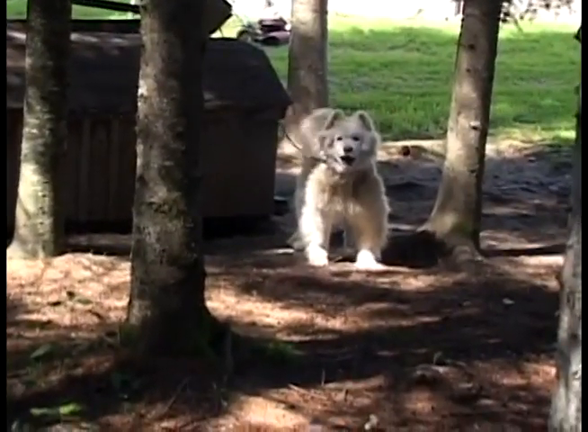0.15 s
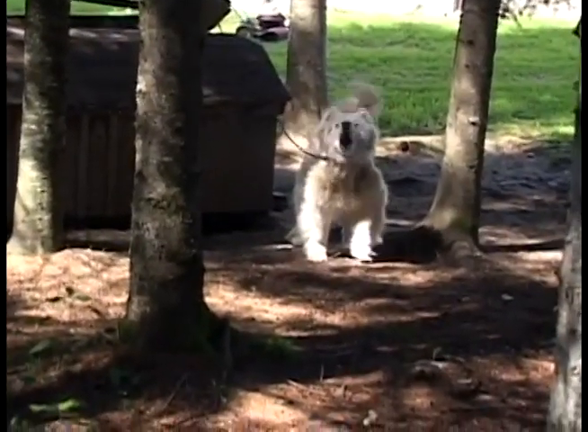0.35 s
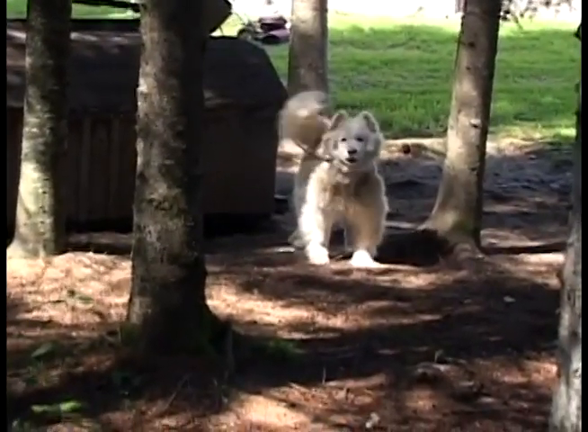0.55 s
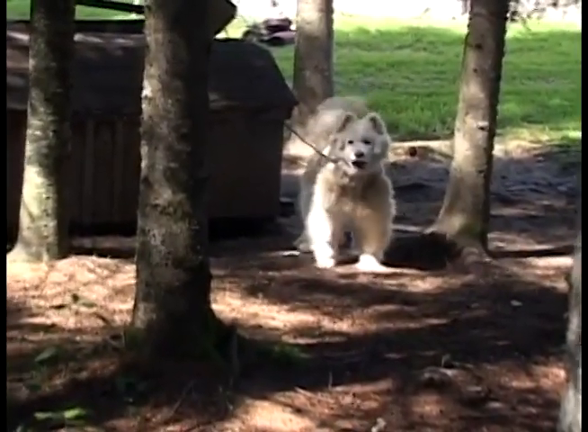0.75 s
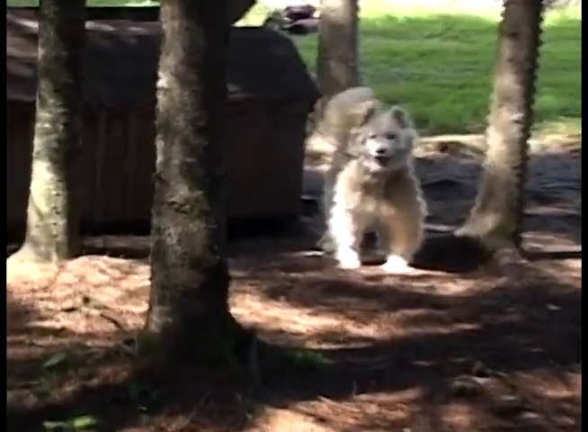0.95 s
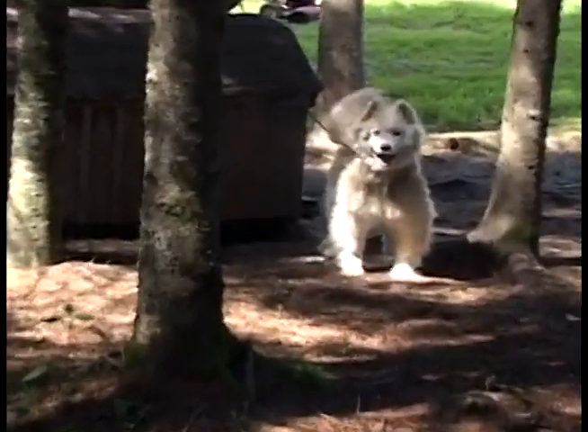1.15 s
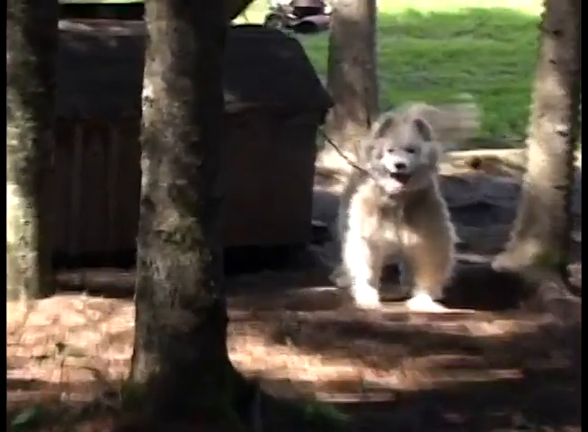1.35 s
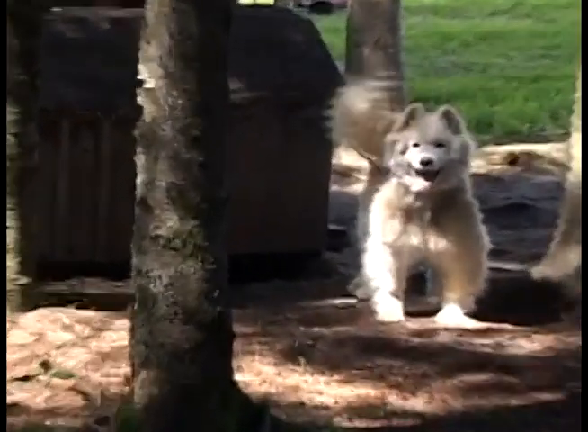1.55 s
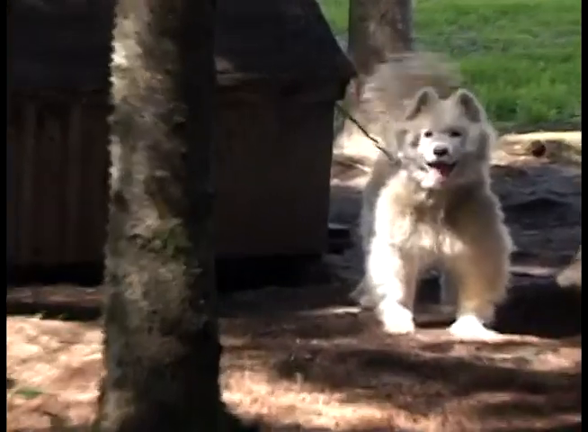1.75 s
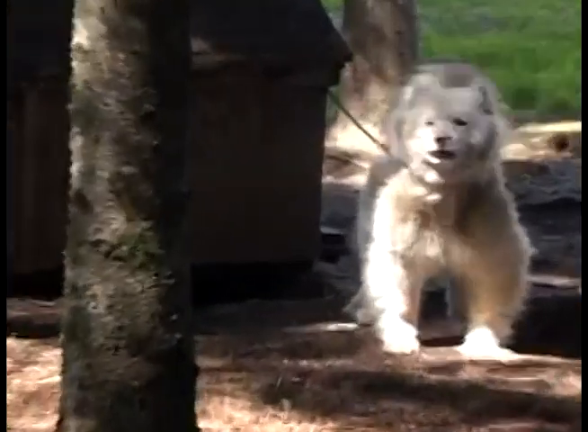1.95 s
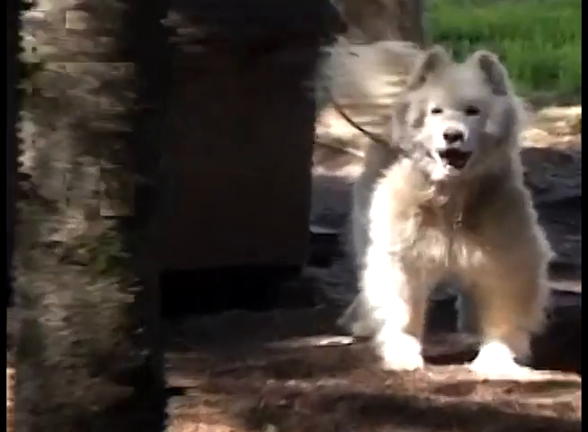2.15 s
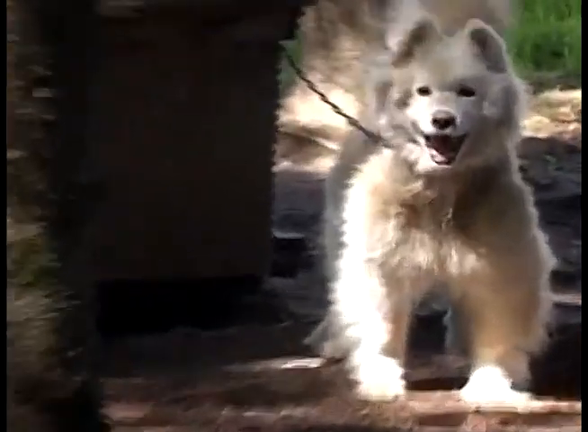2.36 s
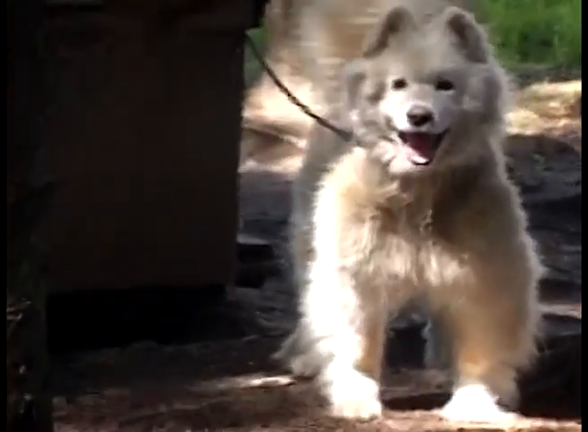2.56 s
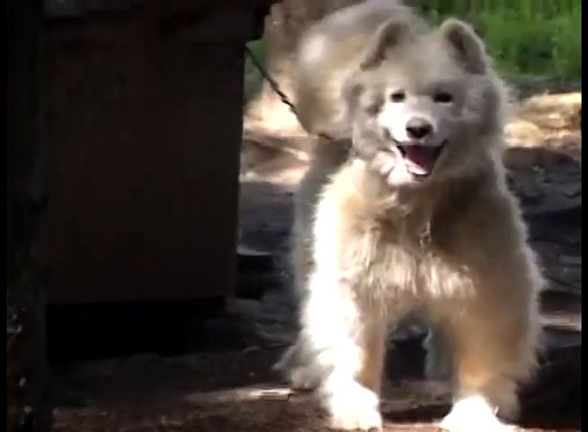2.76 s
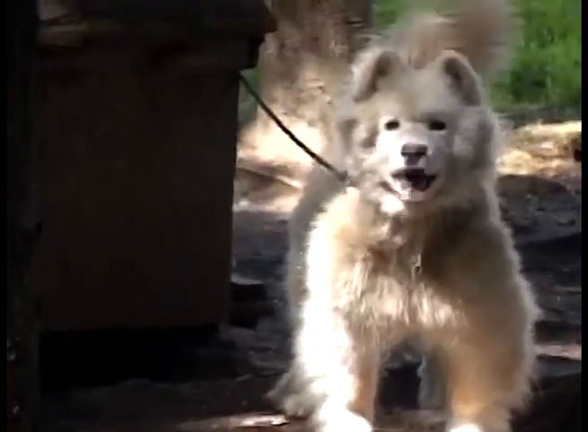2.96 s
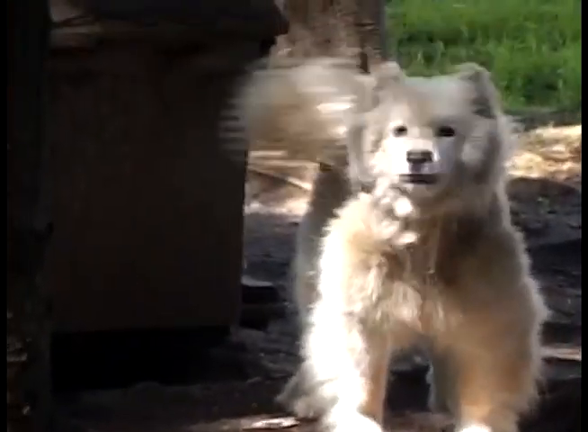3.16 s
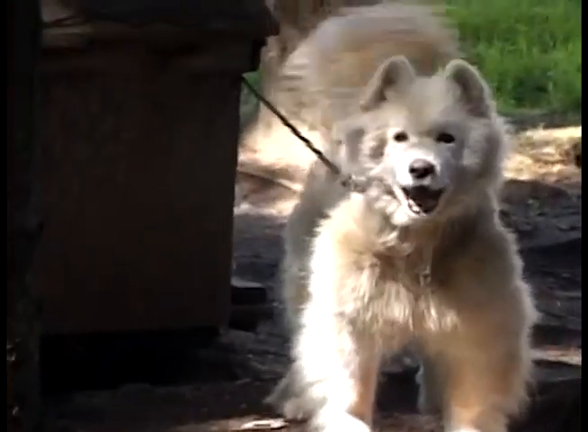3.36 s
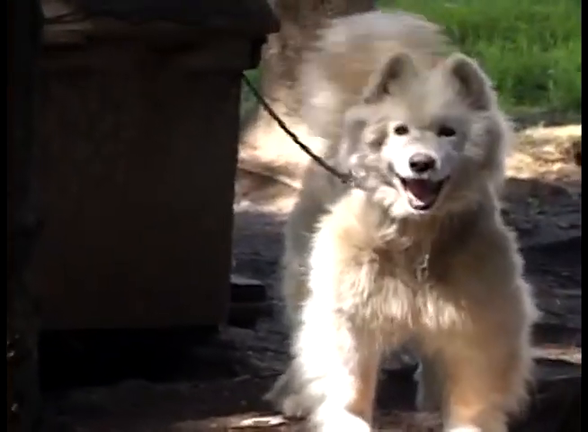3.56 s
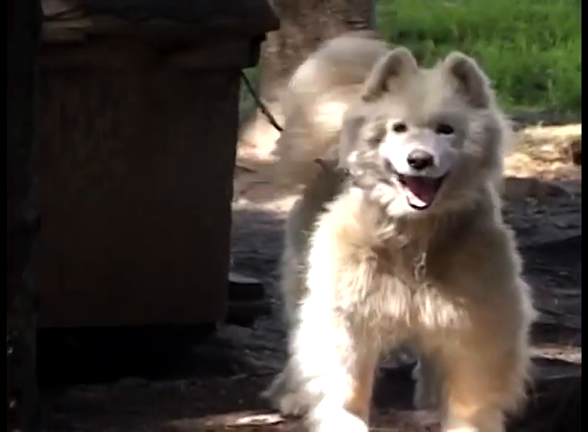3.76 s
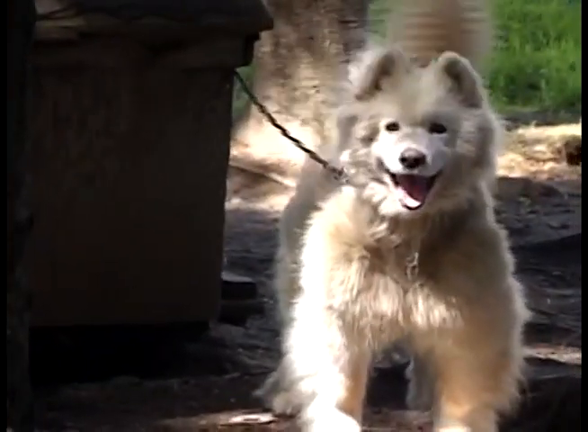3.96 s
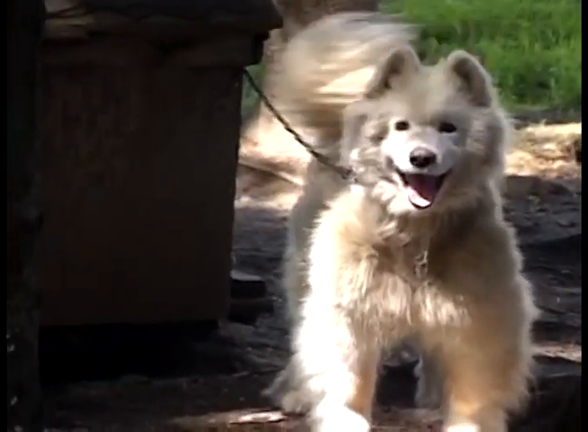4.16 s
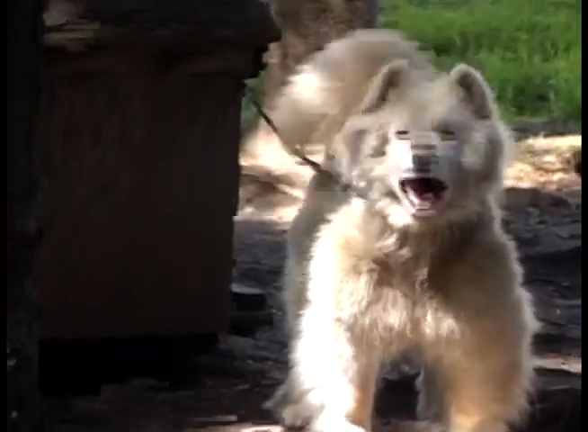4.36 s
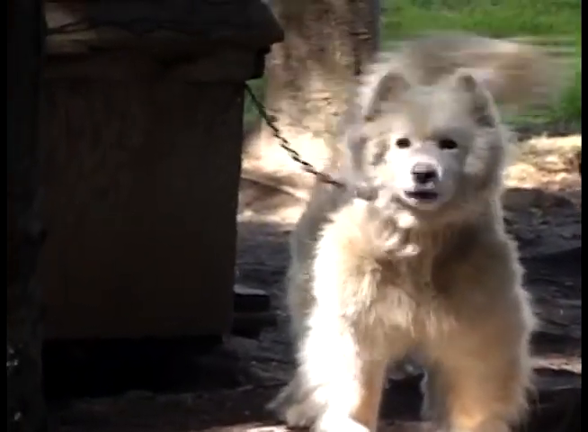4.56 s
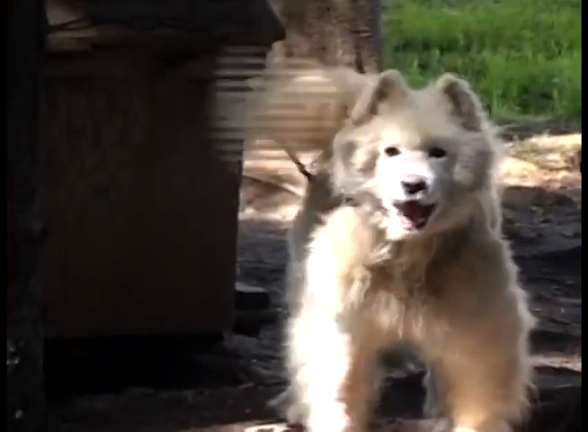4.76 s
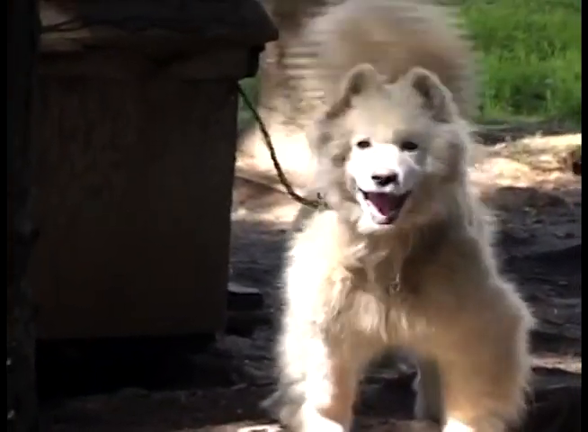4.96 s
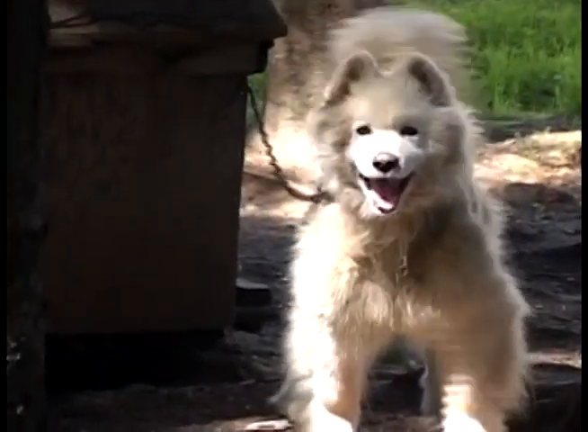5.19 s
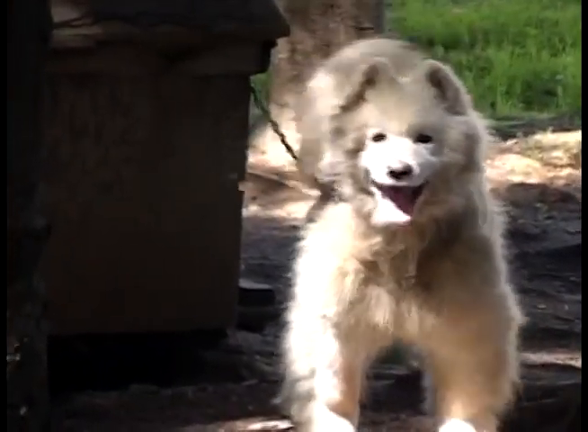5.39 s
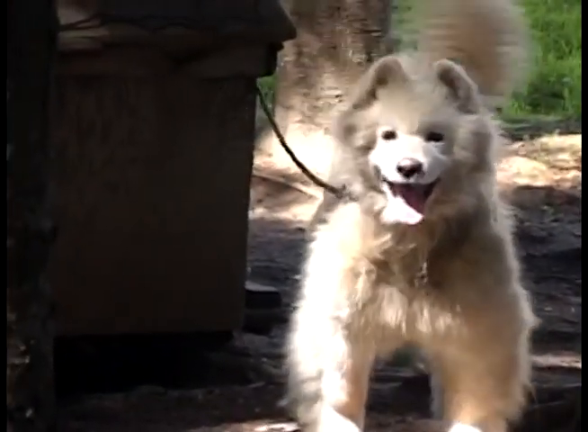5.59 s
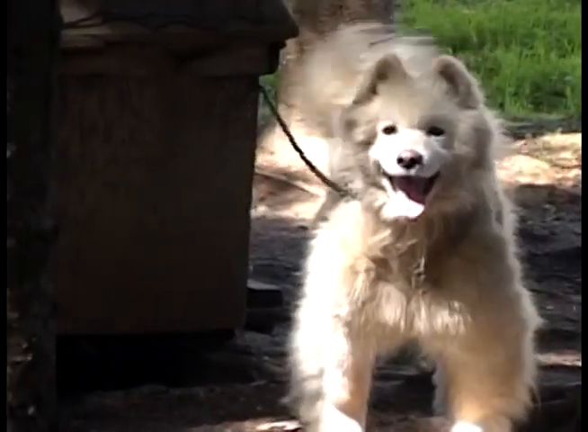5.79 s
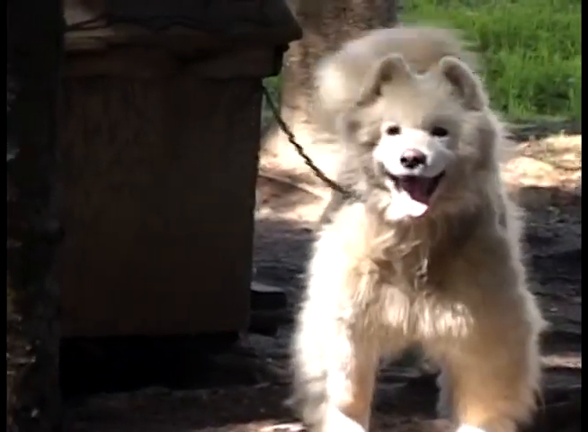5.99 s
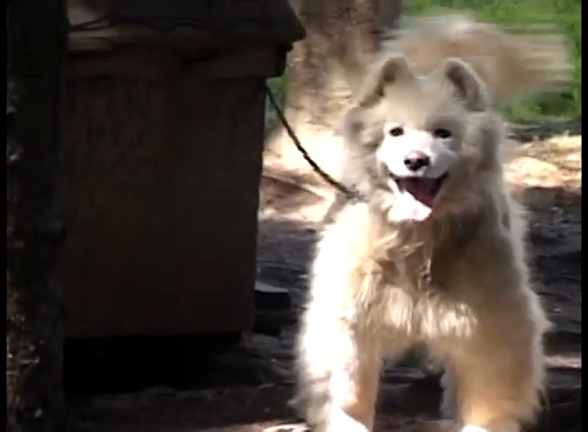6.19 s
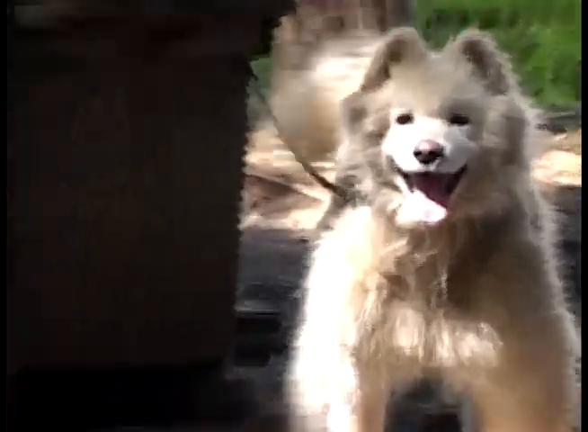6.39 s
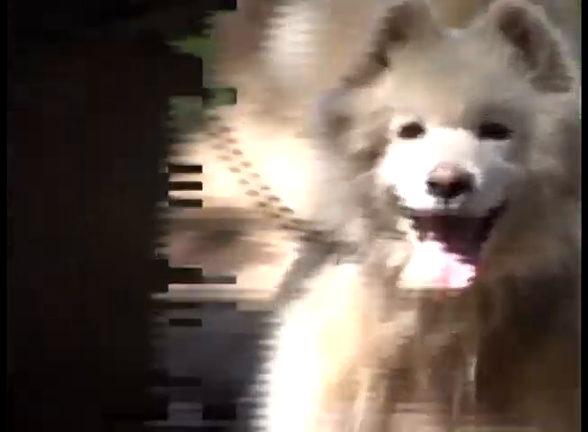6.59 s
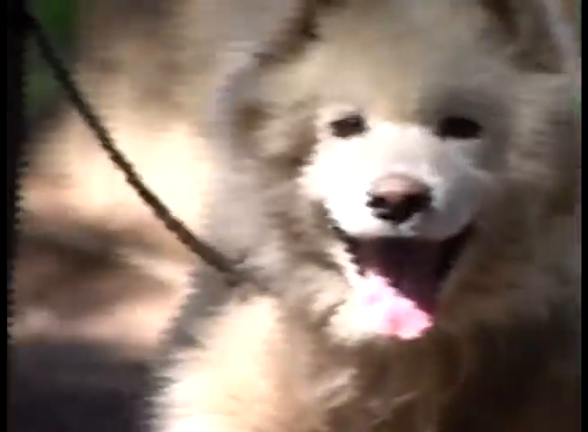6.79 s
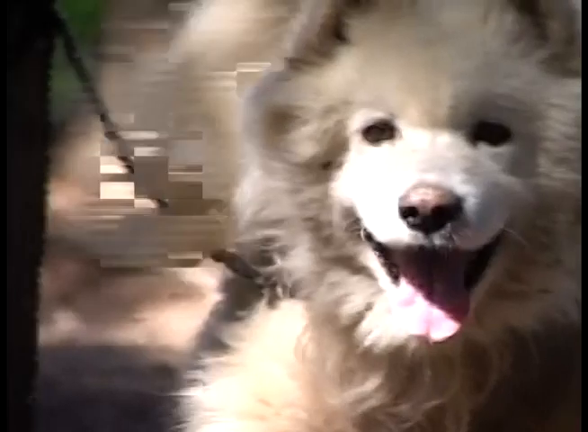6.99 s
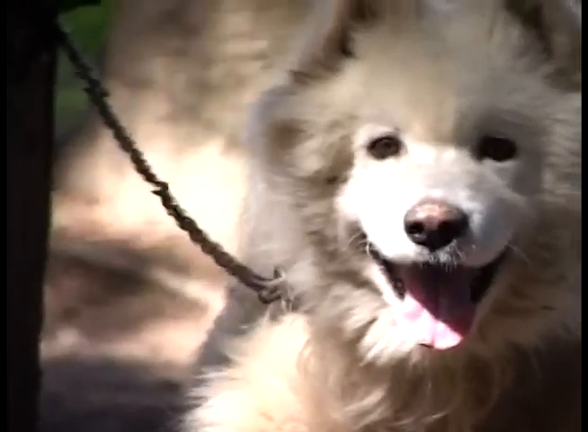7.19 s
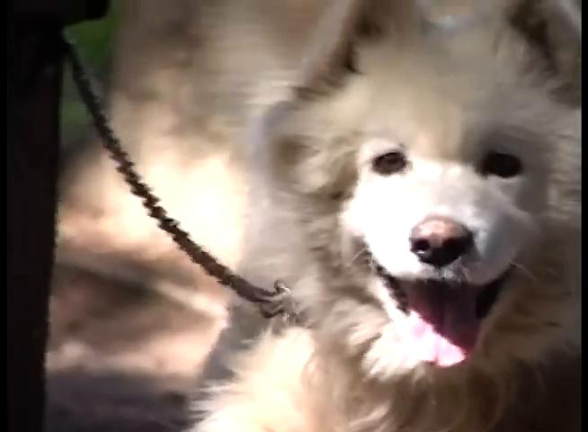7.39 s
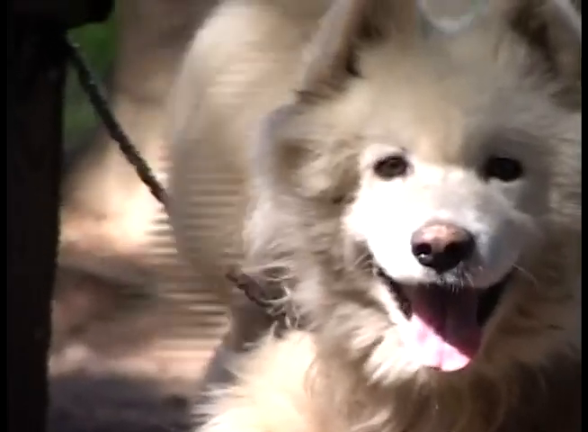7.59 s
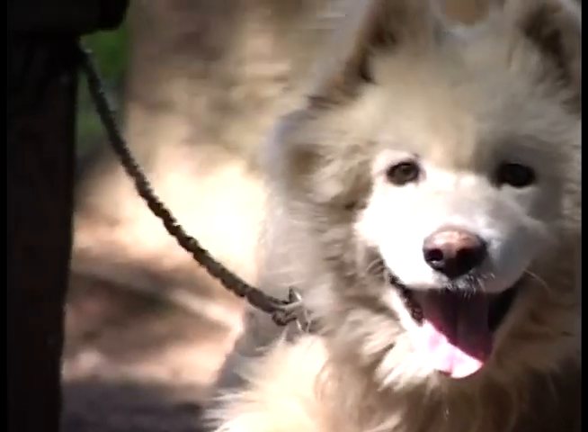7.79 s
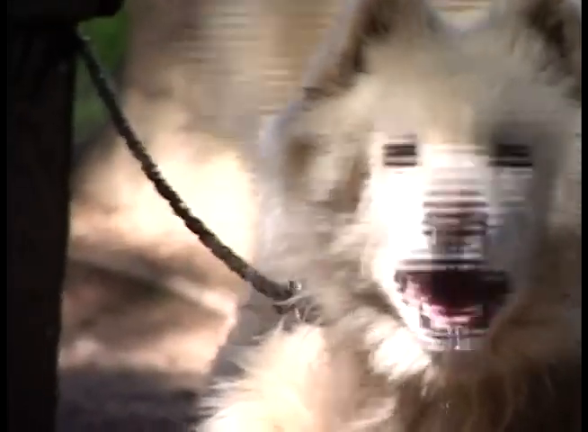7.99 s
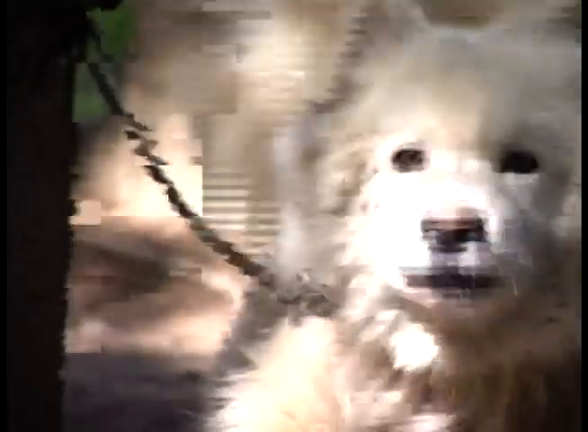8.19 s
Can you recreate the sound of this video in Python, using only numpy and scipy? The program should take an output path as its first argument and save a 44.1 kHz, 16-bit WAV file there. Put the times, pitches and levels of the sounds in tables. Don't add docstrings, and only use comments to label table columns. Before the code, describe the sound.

A large dog gives four short hoarse barks over a whirring tape camcorder, a long pause with a wood knock, then one last bark.

```python
import sys
import numpy as np
from scipy import signal
from scipy.fft import rfft, irfft, next_fast_len
from scipy.io import wavfile
from scipy.ndimage import uniform_filter1d, map_coordinates

SR = 44100
rng = np.random.default_rng(int(sys.argv[2]) if len(sys.argv) > 2 else 0)


def boost(x):
    u = np.asarray(x, float) / 20
    return 10 ** u


def output_pcm(signal):
    pcm = np.clip(np.atleast_2d(signal).T, -1, 1) * 32767
    wavfile.write(sys.argv[1], SR, np.round(pcm).astype(np.int16))


N = 363384
T = np.arange(N) / SR

# (voice start [s], length [s], level [dB], first throat pitch [Hz], mouth resonance [Hz])
BARKS = [
    (0.419, 0.16, -15.5, 497, 935),
    (1.898, 0.17, -14.5, 610, 941.4),
    (3.082, 0.17, -14.5, 555, 969.4),
    (4.468, .16, -14, 751.3, 944.6),
    (8.102, 0.17, -14.5, 740.6, 964.6),
]
# (time [s], peak level [dB], throat ring [Hz])
FOLD_TICKS = [
    (0.395, -21.5, 545),
    (1.882, -21.5, 727),
    (1.895, -17.5, 590),
    (3.053, -29, 731.2),
    (3.082, -12, 586.6),
    (4.419, -27, 874),
    (4.442, -18, 863),
    (4.463, -10.5, 741),
    (8.083, -23, 745),
    (8.105, -9, 704),
]
# (centre [Hz], width [Hz], level [dB])
RASP_MODES = [(778, 340, 15.5), (1219, 255, 15), (1567, 122, 13.5), (1947, 154, 4.5), (2214, 190, 2),
              (2521, 99, 11.5), (2810, 210, 2), (440, 69, 18)]
# (centre [Hz], width [Hz], level [dB])
HISS_MODES = [(3330, 560, 8), (4150, 370, 11.5), (5070, 800, 3.5), (6160, 460, 13), (8070, 420, 5.5),
              (9960, 1160, 4), (11500, 660, 8.5), (13690, 1600, 5.5)]
# (delay [s], level [dB])
SLAPS = [
    (.003, -12),
    (.012, -11.5),
    (.023, -12),
    (.055, -26),
    (.088, -27.5),
    (0.13, -32.5),
]
# (frequency [Hz], t60 [s])
YARD_DECAY = [(400, 1), (950, 1), (2500, 1), (8000, 1)]
# (centre [Hz], width [Hz], level [dB])
KENNEL_MODES = [(610, 110, 2), (960, 39, 5.5), (1420, 140, 5), (2580, 200, -3)]
# (time [s], level [dB])
OVERLOADS = [
    (0.517, -31.5),
    (1.967, -28),
    (1.995, -23),
    (3.162, -20.5),
    (4.527, -23.5),
    (8.162, -23),
    (8.225, -23),
]
# (time [s], peak level [dB], ring [Hz], t60 [s])
CLINKS = [
    (.165, -50, 4000, 0.087),
    (0.274, -52, 5870, .08),
    (.3, -49, 5560, 0.072),
    (.315, -52, 6200, .06),
    (5.522, -41, 870, 0.073),
    (5.53, -37, 873, 0.06),
]
# (frequency [Hz], level [dB per Hz])
WHIRR_COLOUR = [(30, -36), (70, -32), (130, -14), (300, -17), (500, -11), (1050, -8), (1400, -14.5),
                (1800, -18.5), (3000, -20), (5200, -30), (6400, -33), (7000, -41.5), (13500, -53.5),
                (15500, -68)]
# (centre [Hz], width [Hz], level [dB])
CASING_HUMPS = [(231, 23, 13), (401, 78, 11.5), (727, 6.3, 11.5), (857.5, 4.43, 12), (1203, 48, 3.5),
                (1336, 29, 9), (2502, 79, 8.5), (4295, 79, 6), (5975, 130, 6.5), (7770, 570, 6.5),
                (9650, 360, 8.5), (11420, 1000, 7.5)]
# (frequency [Hz], level [dB rms])
DRUM_TONE = [(150, -55.5)]
# (time [s], firing rate [Hz], level [dB])
ENGINE_PATH = [(0, 72, -78), (1.8, 78, -71), (2.6, 77, -77), (3.3, 78.5, -71), (4, 79, -70), (4.7, 76, -87),
               (5.3, 79, -66), (5.7, 73.5, -82), (6.8, 77.5, -77), (7.46, 75.5, -74), (8.24, 69, -84)]
# (frequency [Hz], level [dB rms])
MAINS_HUM = [(30, -92), (60, -87), (100, -93), (120, -95), (200, -102), (219, -102), (240, -100),
             (899, -103)]
# (frequency [Hz], level [dB per Hz])
OPEN_HISS = [(20, 4), (300, 0), (3400, 0), (6700, -1), (9400, -3), (12100, -4.5), (13500, -7), (14100, -13),
             (14800, -32)]


def dog():
    throat_db, gape, throat_hz, mouth_hz, fade, leak = gesture()
    mouth_db = throat_db + 2.5 - 12.5 * (1 - gape)
    rasp_db = -8.5 + 5.5 * gape - 6.5 * fade
    creak_db = -20 * np.sin(np.pi * 115 * T) ** 2
    hiss_db = -24.5 - gape + leak * (26 + creak_db)

    pitch = mouth_hz / 3
    voice = folds(pitch, jitter=.07, scatter_db=2, growl_db=3, breath=.42)
    band = signal.butter(2, [360, 1500], "band", fs=SR, output="sos")
    throat = gliding(voice, throat_hz * (1 + .07 * wobble(30)), width_hz=110)
    throat = steady(signal.sosfilt(band, throat), .03)
    mouth = gliding(voice, mouth_hz * (1 + .02 * wobble(30)), width_hz=85)
    mouth = steady(signal.sosfilt(band, mouth), .03)

    rasp = tract(voice, RASP_MODES, lambda f: low_cut(500, order=2)(f) / (1 + (f / 3000) ** 6), waver_db=2)
    airy = folds(pitch, jitter=.12, scatter_db=3, growl_db=1, breath=.95)
    hiss = tract(airy, HISS_MODES, lambda f: low_cut(2500, order=2)(f) / (1 + 1j * f / 6000) ** 2, waver_db=3)
    top = signal.sosfilt(signal.butter(2, 7000, "high", fs=SR, output="sos"), hiss)
    hiss = hiss - top * (1 - boost(-10 * (2 - gape)))

    upper = boost(rasp_db) * rasp + boost(hiss_db) * hiss
    throat = boost(-3.5 * gape) * throat
    return boost(5) * (boost(throat_db) * (throat + upper) - boost(mouth_db) * mouth)


def gesture():
    lead_s, lead_db, start_db, catch_db = .04, -32, -10, -6
    attack, hold, end_db = 0.2, 0.66, -15
    widest, opening, closing = 0.57, 0.32, 0.25
    open_throat_hz, shut_throat_hz, throat_sag = 675, 610, .94
    earlier_db, earlier_t60_s, earlier_hz = -47, 1.58, 527

    start, length, db, first_hz, mouth_hz = np.transpose(BARKS)
    k = np.clip(np.searchsorted(start - 2 * lead_s, T) - 1, 0, len(BARKS) - 1)
    since = T - start[k]
    u = since / length[k]
    leak = np.clip(-since / lead_s, 0, 2)
    fade = np.clip((u - hold) / (1 - hold), 0, 1)
    effort_db = db[k] + start_db * np.clip(1 - u / attack, 0, 1) + lead_db * leak
    effort_db = effort_db + catch_db * np.clip(-since / 0.0026, 0, 1)
    effort_db = effort_db + end_db * fade - 60 * np.clip((u - 1) / 0.17, 0, 1)

    gape = np.exp(-((u - widest) / np.where(u < widest, opening, closing)) ** 2)
    last_hz = throat_sag * np.minimum(first_hz[k], shut_throat_hz)
    shut_hz = np.where(u < widest, first_hz[k], last_hz)
    throat_hz = shut_hz + gape * (open_throat_hz - shut_hz)

    ring_db = earlier_db - 60 * T / earlier_t60_s
    ring = ring_db > effort_db
    climb = .15 * (1 - gape) * (u < widest) * ~ring
    return (np.maximum(effort_db, ring_db), np.where(ring, .8, gape), np.where(ring, earlier_hz, throat_hz),
            mouth_hz[k] * (1 - climb), fade, np.where(ring, 0, np.minimum(leak, 1)))


def folds(pitch_hz, jitter, scatter_db, growl_db, breath):
    cycles = np.cumsum(pitch_hz * (1 + jitter * wobble(250))) / SR
    growl = boost(growl_db * np.cos(2 * np.pi * cycles / 3))
    pulses = np.diff(np.floor(cycles), prepend=0) * boost(scatter_db * wobble(300))
    puffs = rng.standard_normal(N) * (2 + np.cos(2 * np.pi * cycles))
    share = np.clip(breath, 0, 1)
    return growl * (np.sqrt(1 - share) * unit(pulses) + np.sqrt(share) * unit(puffs))


def tract(x, modes, slope, waver_db):
    x = filtered(x, slope)
    total = np.zeros(N)
    for k, (hz, width, db) in enumerate(modes):
        ring = signal.lfilter(*signal.iirpeak(hz, hz / width, SR), x)
        total += (-1) ** k * boost(db + waver_db * wobble(22)) * ring
    return steady(total, 0.071)


def ticks():
    out, t = np.zeros(N + SR), T[:SR // 20]
    for s, db, hz in FOLD_TICKS:
        noise = np.convolve(rng.standard_normal(len(t)), np.hanning(11), "same")
        click = 0.12 * boost(-60 * t / 0.013) * noise
        ring = boost(-60 * t / 0.012) * np.sin(2 * np.pi * hz * t)
        out[round(s * SR):][:len(t)] += boost(db - 4.0) * (ring + click)
    return out[:N]


def yard(x):
    hz, t, z = signal.stft(rng.standard_normal(SR), SR, nperseg=256)
    decay = boost(-60 * t / along(YARD_DECAY, hz)[:, None])
    tail = signal.istft(z * decay, SR, nperseg=256)[1]
    near = np.zeros(len(tail))
    far = boost(-29) * tail / np.linalg.norm(tail)
    for s, db in SLAPS:
        smear = rng.standard_normal(300) * np.hanning(300)
        side = near if s < .04 else far
        side[round(s * SR):][:300] += boost(db) * smear / np.linalg.norm(smear)
    hollow = sum(boost(db) * signal.lfilter(*signal.iirpeak(c, c / w, SR), far) for c, w, db in KENNEL_MODES)
    echoes = signal.fftconvolve(x, near + far + hollow)[:N]
    return signal.lfilter(*signal.butter(1, 3000, fs=SR), echoes)


def clinks():
    out, t = np.zeros(N + SR), T[:SR // 4]
    for s, db, hz, t60 in CLINKS:
        ring = np.sin(2 * np.pi * hz * t) + .6 * np.sin(2 * np.pi * hz * 1.06 * t)
        out[round(s * SR):][:len(t)] += boost(db - 60 * t / t60) * (1 - np.exp(-t / 0.00075)) * ring
    return out[:N]


def whirr():
    z = signal.stft(rng.standard_normal(N), nperseg=512)[2]
    patches = uniform_filter1d(rng.standard_normal(z.shape), size=6, axis=0)
    patches = uniform_filter1d(patches, size=8, axis=1)
    noise = signal.istft(z * boost(.8 * unit(patches)), nperseg=512)[1][:N]
    throb_cycles = np.cumsum(37.3 + 1.2 * wobble(3)) / SR
    throb_db = .9 * np.sin(2 * np.pi * throb_cycles) + .7 * wobble(30)

    def casing(f):
        humps_db = sum(db / (1 + (2 * (f - c) / w) ** 2) for c, w, db in CASING_HUMPS)
        return boost(along(WHIRR_COLOUR, f) + humps_db)

    out = boost(-45) * unit(filtered(noise * boost(throb_db), casing))
    for hz, db in DRUM_TONE:
        level = boost(db + 2.5 + 0.78 * wobble(12))
        out = out + level * np.sin(2 * np.pi * hz * T + 0.095 * wobble(13))
    return out


def engine():
    s, hz, db = np.transpose(ENGINE_PATH)
    turns = np.cumsum(np.interp(T, s, hz) + 1.34 * wobble(8.4)) / SR
    return boost(8.0 + np.interp(T, s, db) + 1.5 * wobble(6)) * np.sin(2 * np.pi * turns)


def open_input():
    hiss = filtered(rng.standard_normal(N), lambda f: boost(along(OPEN_HISS, f)))
    hum = sum(boost(db + 3) * np.sin(2 * np.pi * (hz * T + rng.random())) for hz, db in MAINS_HUM)
    return boost(-75.5) * unit(hiss) + hum


def unit(x):
    return x / np.sqrt(np.mean(x ** 2) + 1e-20)


def along(points, hz):
    f, v = np.transpose(points)
    return np.interp(np.log(hz + 1), np.log(f + 1), v)


def wobble(rate):
    return map_coordinates(rng.standard_normal(int(N * rate / SR) + 4), [T * rate])


def filtered(x, response):
    m = next_fast_len(N + SR)
    return irfft(rfft(x, m) * response(np.fft.rfftfreq(m, 1 / SR)), m)[..., :N]


def low_cut(hz, order):
    return lambda f: (1j * f / (hz + 1j * f)) ** order


def gliding(x, hz, width_hz):
    turn = np.exp(2j * np.pi * np.cumsum(hz) / SR)
    return np.real(turn * signal.lfilter([1], [1, -np.exp(-np.pi * width_hz / SR)], x / turn))


def steady(x, span):
    power = np.abs(uniform_filter1d(x ** 2, max(int(span * SR), 1)))
    return x / np.sqrt(power + 1e-12)


def scene():
    lips = signal.butter(8, 385, "high", fs=SR, output="sos")
    bark = signal.sosfilt(lips, dog() + ticks())
    left = bark + yard(bark) + clinks() + whirr() + engine()
    return np.array([left, open_input()])


def roll_off(x):
    return signal.sosfilt(signal.butter(12, 15590, fs=SR, output="sos"), x)


def record(dry):
    recovery_s = 0.0051
    sag = np.zeros(N)
    for s, db in OVERLOADS:
        u = np.maximum(T - s, 0) / recovery_s
        sag -= boost(db) * u * np.exp(1 - u)
    lopsided = -.05 * dry[0] ** 2
    left = dry[0] + filtered(sag + lopsided, low_cut(3.9, order=3))
    left = left / (1 + np.abs(left) ** 24) ** (1 / 24)
    return roll_off(np.array([left, dry[1]]))


dry = scene()
out = record(dry)
output_pcm(out)
```